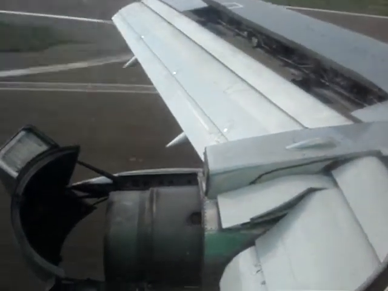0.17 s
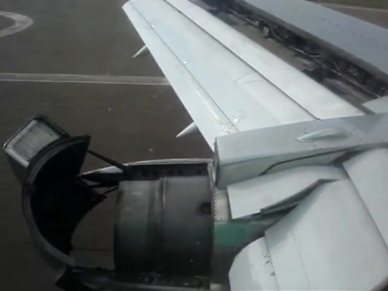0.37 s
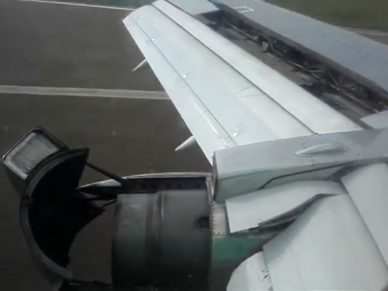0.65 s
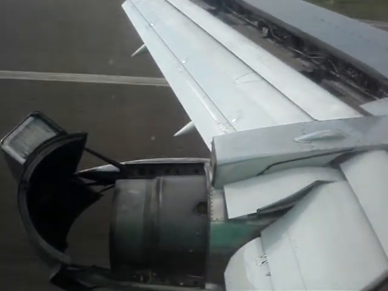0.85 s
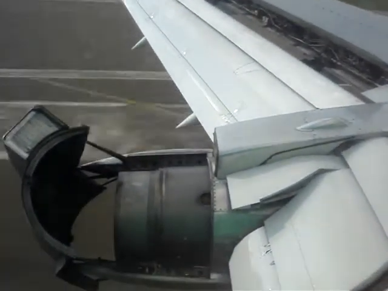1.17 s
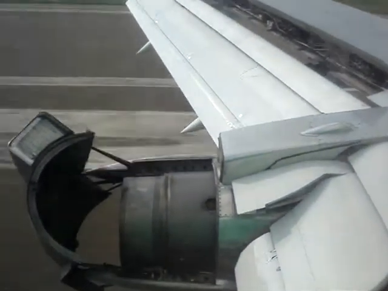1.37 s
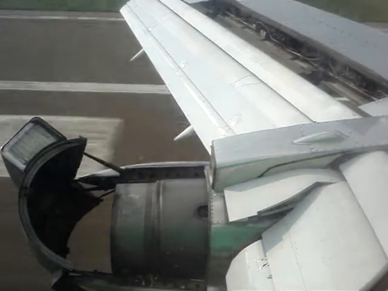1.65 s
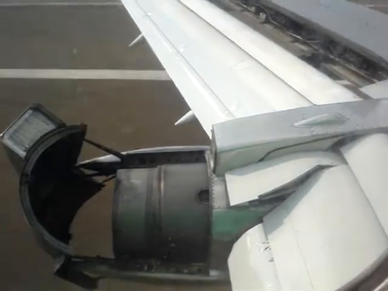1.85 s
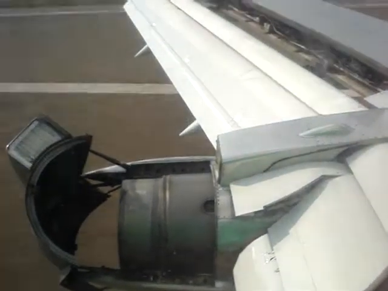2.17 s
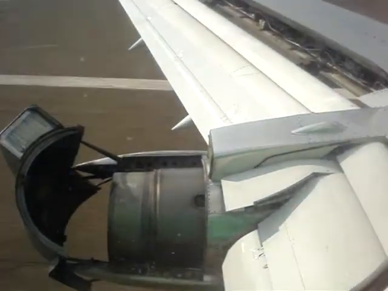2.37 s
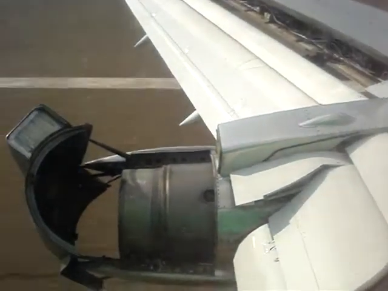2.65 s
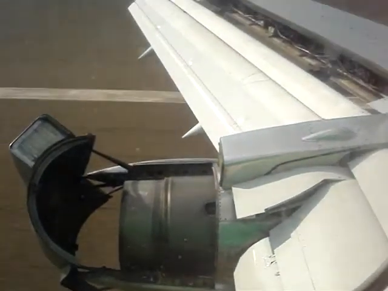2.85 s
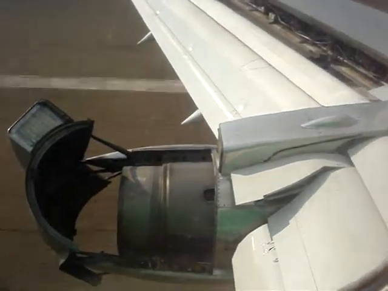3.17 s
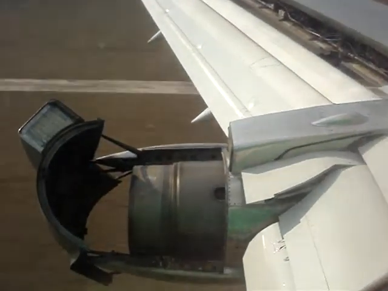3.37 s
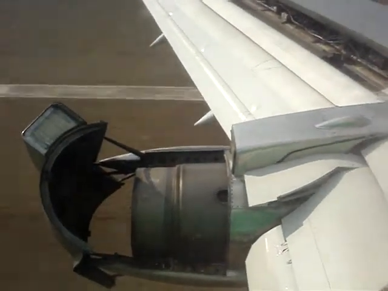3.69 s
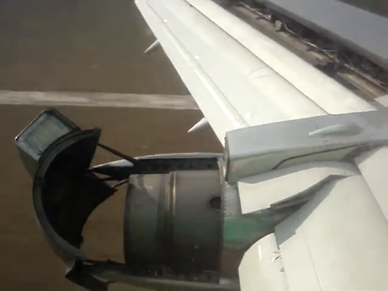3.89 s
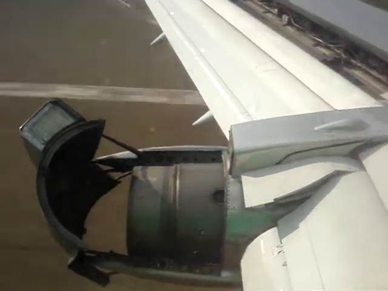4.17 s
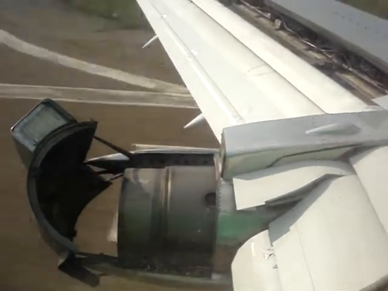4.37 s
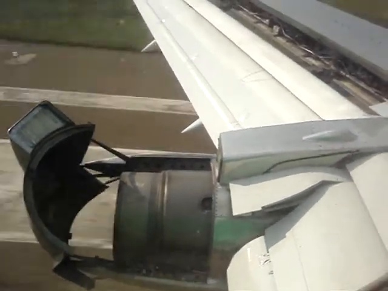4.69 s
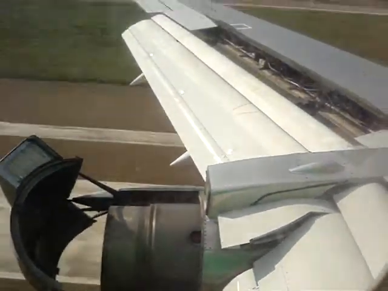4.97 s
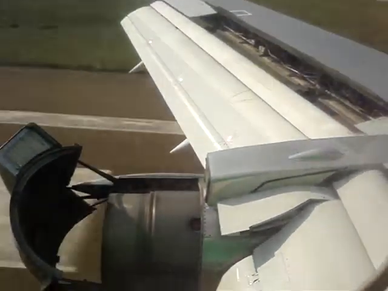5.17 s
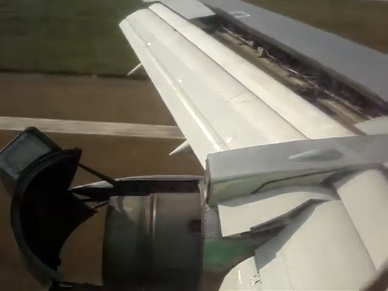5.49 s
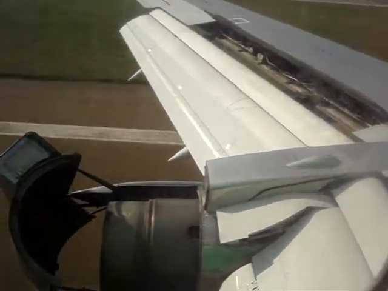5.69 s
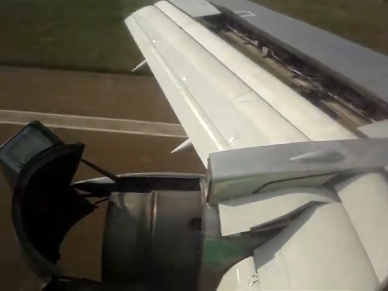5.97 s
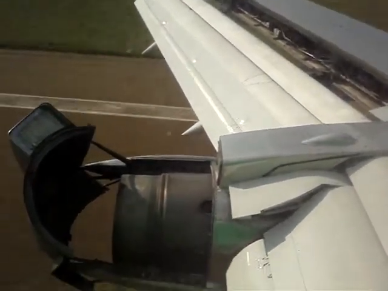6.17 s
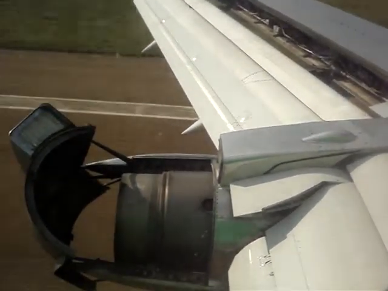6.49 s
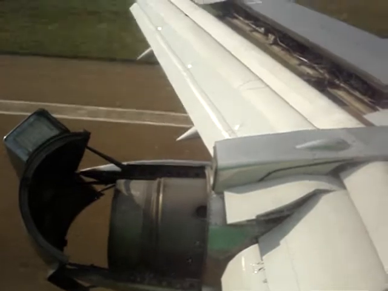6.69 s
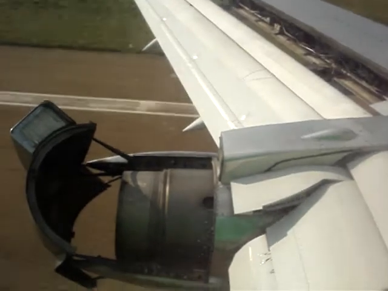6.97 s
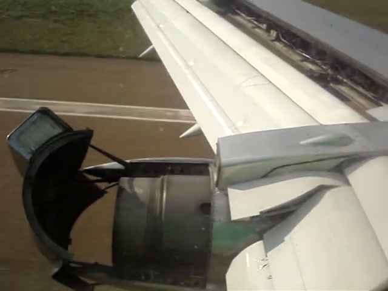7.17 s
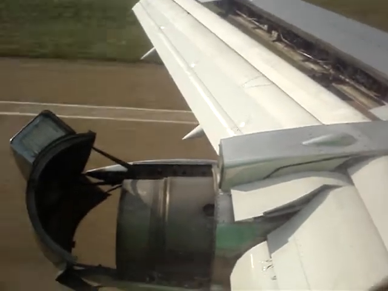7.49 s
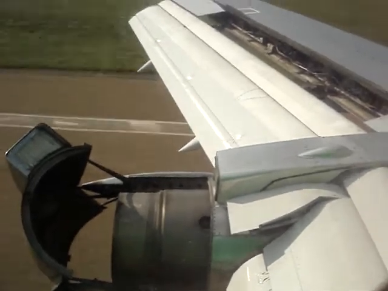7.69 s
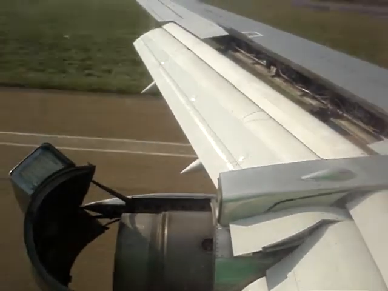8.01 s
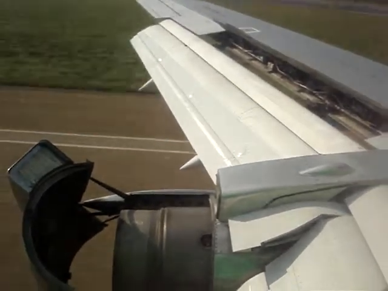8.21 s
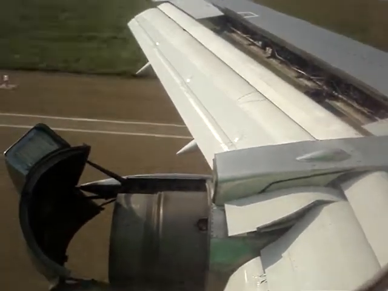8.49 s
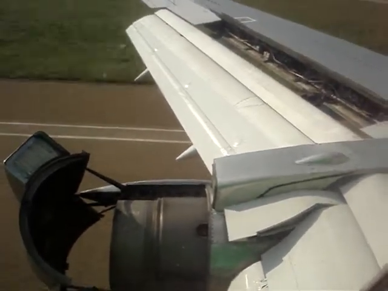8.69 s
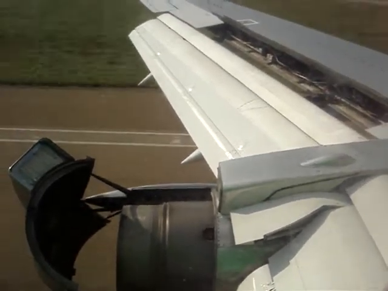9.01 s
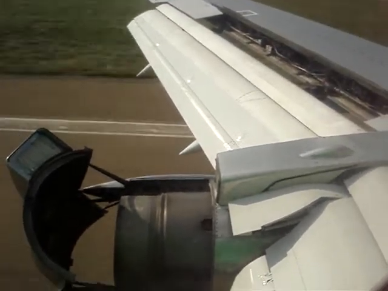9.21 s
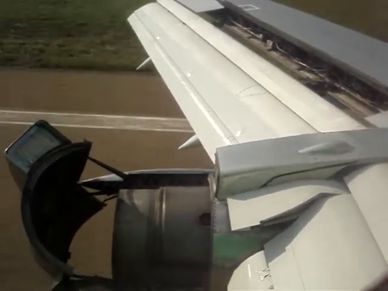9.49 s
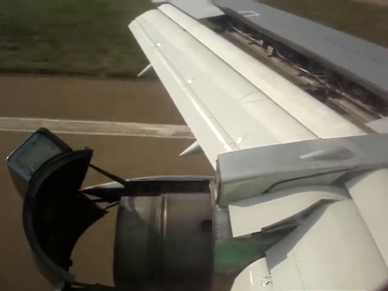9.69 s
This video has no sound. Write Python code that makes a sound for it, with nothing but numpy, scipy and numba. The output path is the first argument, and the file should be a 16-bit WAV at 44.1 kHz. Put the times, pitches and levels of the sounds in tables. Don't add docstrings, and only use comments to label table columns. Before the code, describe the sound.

A small camera at an airliner's cabin window, an arm's length from the plastic trim, during runway braking. From 0 s reversed thrust is already at full roar: a broad, deep boom around 200 to 350 Hz coming through the hull, with a weaker upper rush and faint hiss. Over it loose panels chatter in dense, dry, irregular bursts, bright around 1 to 5 kHz, swelling at each runway bump. From 0.6 s short hard knocks stand out, frequent from 1.6 to 6 s, with a strong one near 5.96 s. At about 6.4 s the braking eases and the rattle sinks fast; brief bump rattles come near 7, 7.4, 8 and 8.3 s, with scattered lighter ticks until the end. The roar wavers slightly from 6.5 to 8 s but stays loud to 9.8 s, ending abruptly. The sound is compressed, clipped at peaks, with flickering treble and nothing above 10 kHz.

```python
import sys
import numpy as np
from scipy import signal
from scipy.fft import rfft, irfft, next_fast_len
from scipy.io import wavfile
from scipy.ndimage import uniform_filter1d
from numba import njit

SR = 44100
rng = np.random.default_rng(int(sys.argv[2]) if len(sys.argv) > 2 else 0)


def nominal_scale(level):
    x = np.asarray(level, float) / 20
    return 10 ** x


def to_wav(sig):
    pcm = np.clip(np.atleast_2d(sig), -1, 1) * 32767
    pcm = np.round(pcm).astype(np.int16)
    wavfile.write(sys.argv[1], SR, pcm.T)


N = 434384
SPAN = next_fast_len(N)

# time_s, roar_db
THRUST = [(0.0, -15.5), (.5, -14.5), (1.7, -15), (2.9, -14.5), (3.3, -15), (4.3, -15), (5.8, -15),
          (6.55, -16.5), (6.8, -14), (7.05, -16), (7.35, -14), (7.9, -15.5), (8.6, -14), (9.5, -14.5),
          (9.85, -14.5)]
# time_s, effort (0-1)
BRAKING = [(0.0, 0.97), (1.0, 1.0), (1.25, 0.91), (1.6, 1.0), (2.9, 0.98), (3.3, .85), (3.7, 0.98),
           (4.4, 0.91), (5.3, .82), (5.7, 0.87), (6.35, 0.9), (6.55, 0.4), (7.5, 0.14), (8.9, 0.18),
           (9.6, .08), (9.85, -.2)]
# frequency_hz, level_db (per Hz)
HULL_ROAR = [(12, -49.5), (20, -49.5), (98, -13.5), (166, -3.5), (221, -1), (251, -1), (286, -1),
             (423, -9.5), (482, -13), (522, -13.5), (564, -16), (976, -24), (2560, -41), (7090, -61.5),
             (10200, -71.5), (13300, -90), (22000, -120)]
# frequency_hz, width_hz, gain_db
CABIN_MODES = [(86.6, 14, 0), (168, 13, 2.5), (217.2, 40, 3.5), (256.7, 12.2, -10), (295, 24, -0.5),
               (344, 41, 2.5), (484, 50, 3), (607, 77, 2.5), (1327, 110, 3.5), (1520, 22, 5.5),
               (1730, 420, -3.5), (2050, 230, 3.5), (3600, 3300, -5.5), (5530, 1200, 1), (8760, 6600, 3)]
# pitch_hz, t60_s, level_db
TRIM_RINGS = [(978, 0.04, 0), (1121, 0.046, 8), (1357, 0.012, 7.5), (2050, 0.0067, 1.5),
              (2580, 0.028, -1.5), (3100, 0.0085, 2.5)]
# frequency_hz, level_db (per Hz)
CLATTER = [(880, -31), (1500, -1.5), (1790, -4.5), (2000, -2), (2570, -0.5), (3770, -6.5), (5600, -7.5),
           (9090, -18), (10000, -18.5), (13000, -53), (22000, -120)]
# centre_s, added_rattle_db, length_s
JOLTS = [(0.102, 4.5, .12), (0.255, 1, 0.032), (0.342, 3, .07), (0.507, 2.5, 0.11), (0.656, 4, 0.24),
         (0.97, 3.5, .18), (1.648, 1, 0.13), (1.895, 5, .07), (2.227, 2.5, .09), (2.582, 1, 0.055),
         (2.884, 3.5, .07), (3.173, 6.5, 0.097), (3.581, 3.5, .09), (3.722, 2, .07), (3.914, 4, .07),
         (4.091, 5, .08), (4.525, 4.5, .13), (4.699, 5.5, 0.12), (4.94, 5, .13), (5.09, 3, .05),
         (5.382, 3.5, 0.081), (5.968, 4.5, 0.21), (6.247, -1, .06), (6.375, 0.5, 0.059), (6.96, 8, .09),
         (7.14, 6, 0.061), (7.398, 7.5, .07), (7.991, 5, .06), (8.268, 6.5, 0.048), (9.547, 4.5, 0.056)]
# start_s, peak_db, pitch_hz
HARD_TICKS = [(0.6, -16, 2620), (1.592, -15.5, 2280), (1.742, -13, 2480), (1.877, -14.5, 2670),
              (2.0447, -14.5, 2500), (2.2316, -12.5, 2510), (2.418, -16, 2510), (2.5718, -12, 2470),
              (2.7354, -12.5, 1930), (2.7627, -15.5, 3180), (2.8695, -17.5, 3100), (3.1736, -17, 3040),
              (3.4785, -14, 3180), (3.6923, -14, 2600), (3.805, -12.5, 2050), (3.9972, -15, 2620),
              (4.0657, -14, 2020), (4.255, -11.5, 2610), (4.487, -19.5, 2300), (4.573, -18, 3040),
              (4.696, -17, 2300), (4.871, -13, 2460), (4.9375, -15.5, 2710), (5.1814, -13.5, 2530),
              (5.487, -16.5, 2640), (5.5595, -16, 2490), (5.7678, -13.5, 2050), (5.821, -16, 2530),
              (5.94, -13.5, 2540), (5.9644, -10.5, 2710)]
# start_s, peak_db, pitch_hz
LATE_TICKS = [(6.5644, -23, 2970), (6.8419, -22, 2080), (6.9781, -19.5, 1810), (7.1248, -26.5, 2240),
              (7.411, -22.5, 2890), (7.482, -21, 2160), (7.717, -22.5, 2010), (8.11, -28, 2040),
              (8.56, -27.5, 2200), (8.77, -22.5, 2040), (8.845, -19.5, 2650), (8.9427, -22.5, 2060),
              (9.167, -28.5, 2080), (9.2924, -24, 2050), (9.5323, -22, 2260), (9.5972, -24.5, 2170)]
DROPOUT_EDGES = [4700, 5150, 5650, 6150, 6700, 7350, 8050, 8800, 9500, 11000]


def curve(table, column):
    rows = np.array(table)
    return np.interp(np.arange(N) / SR, rows[:, 0], rows[:, column])


def shape(table, hz):
    rows = np.array(table)
    return np.interp(np.log(hz), np.log(rows[:, 0]), rows[:, 1])


def unit(x):
    return x / np.sqrt(np.mean(x ** 2))


def walk(rate_hz):
    hold = int(SR / rate_hz)
    steps = np.repeat(rng.standard_normal(N // hold + 1), hold)
    slewed = uniform_filter1d(uniform_filter1d(steps, hold), hold)
    return unit(slewed[:N])


def ring(strike, hz, t60_s):
    decay = np.log(1000) / (max(t60_s, .001) * SR)
    pole = np.exp(2j * np.pi * hz / SR - decay)
    return signal.lfilter([1], [1, -pole], strike).imag


def roar(boom_hz=450, hiss_hz=1700, hiss_db=-39, flicker_db=0.43):
    hz = np.fft.rfftfreq(SPAN, 1 / SR) + 1e-3
    db = shape(HULL_ROAR, hz)
    for mode_hz, width_hz, gain_db in CABIN_MODES:
        db = db + gain_db / (1 + (2 * (hz - mode_hz) / width_hz) ** 2)
    jet = rfft(rng.standard_normal(SPAN)) * nominal_scale(db)

    low = 1 / (1 + (hz / boom_hz) ** 6)
    high = 1 / (1 + (hiss_hz / hz) ** 6)
    boom, upper, hiss = (unit(irfft(jet * share, SPAN)[:N]) for share in (low, 1 - low - high, high))
    thrust_db = curve(THRUST, 1)
    boom *= nominal_scale(thrust_db + 2.0)
    upper *= nominal_scale(thrust_db - 11 + 3.5 * curve(BRAKING, 1) + flicker_db * walk(10))
    return boom + upper + hiss * nominal_scale(hiss_db + 0.96 * walk(30))


def shake(calm_db=-52.5, braked_db=18, stir_s=0.033, stir_db_per_db=0.25, stir_from_db=-15.5):
    t = np.arange(0, N, 100) / SR
    effort = np.clip(curve(BRAKING, 1)[::100], -.5, 1.2)
    bed = calm_db + braked_db * effort

    def swell(centre_s, length_s):
        return np.exp(-(2 * (t - centre_s) / length_s) ** 2)

    db = bed + sum(gain_db * swell(centre_s, length_s) for centre_s, gain_db, length_s in JOLTS)
    threshold_db = stir_from_db + 0.4 * (bed - bed.max())
    for start_s, peak_db, _ in HARD_TICKS + LATE_TICKS:
        stir_db = stir_db_per_db * np.maximum(peak_db - threshold_db, 0)
        db += stir_db * swell(start_s, stir_s)
    return np.interp(np.arange(N) / SR, t, db)


def knocks(per_s, spread_db):
    moment, force, side = rng.random((3, 30000))[:, :int(per_s * N / SR)]
    out = np.zeros(N)
    out[(moment * N).astype(int)] = np.sign(side - .5) * nominal_scale(-spread_db * np.log(force + 0.00082))
    return out


def rattle(burst_db=-0.5, patchy_db=0.0, clatter_db=2.0):
    panels = 0
    for pitch_hz, t60_s, db in TRIM_RINGS:
        level = nominal_scale(db + patchy_db * walk(25))
        panels = panels + level * unit(ring(knocks(500, 2.9), pitch_hz, t60_s))

    hz = np.fft.rfftfreq(SPAN, 1 / SR) + 1e-3
    common = .8 * knocks(2400, 1.3)
    clatter = 0
    for centre_hz in 1600 * 1.3 ** np.arange(8):
        band = nominal_scale(shape(CLATTER, hz)) * np.exp(-(np.log(hz / centre_hz) / 0.23) ** 2)
        level = nominal_scale(1.1 * walk(50))
        contacts = common + knocks(2500, 2.2)
        clatter = clatter + level * irfft(rfft(contacts, SPAN) * band, SPAN)[:N]

    burst = nominal_scale(burst_db * walk(60) + 1.73 * walk(130))
    chatter = (unit(panels) + nominal_scale(clatter_db) * unit(clatter)) * burst
    return unit(chatter) * nominal_scale(shake() + 5.0)


def ticks(t60_s=0.013, crack_db=-9, crack_hz=4000):
    out = np.zeros(N + SR)
    t = np.arange(SR // 20) / SR
    for start_s, peak_db, pitch_hz in HARD_TICKS + LATE_TICKS:
        tone = np.sin(2 * np.pi * pitch_hz * t) * np.exp(-np.log(1000) * t / t60_s)
        crack = unit(ring(rng.standard_normal(len(t)), crack_hz, .0008)) * np.exp(-t / .004)
        start = int(start_s * SR)
        out[start:start + len(t)] += nominal_scale(peak_db - 2.0) * (tone + nominal_scale(crack_db) * crack)
    return out[:N]


def scene():
    return (roar() + rattle() + ticks())[None]


@njit
def ride(x, top, attack, release, slope):
    y, envelope = np.empty(len(x)), top
    for i in range(len(x)):
        level = abs(x[i])
        envelope += (level - envelope) * (attack if level > envelope else release)
        y[i] = x[i] * (top / max(envelope, 1e-6)) ** slope
    return y


def thin_treble(x, under_db, luck_db, size, top_hz=9990):
    hz, _, spec = signal.stft(np.pad(x, (0, size), "reflect"), SR, "cosine", size, boundary="even")
    count = spec.shape[1]
    strain = luck_db * rng.standard_normal(count)
    frames = np.minimum(np.arange(count) * size // 2, N - 1)
    strain -= .06 * (shake()[frames] + 38)
    for lo_hz, hi_hz in zip(DROPOUT_EDGES, DROPOUT_EDGES[1:]):
        band = (hz >= lo_hz) & (hz < hi_hz)
        db = 10 * np.log10(np.mean(np.abs(spec[band]) ** 2, axis=0) + 1e-18)
        dip = db - uniform_filter1d(db, size=15)
        luck = uniform_filter1d(rng.standard_normal(count), size=2)
        margin_db = .5 * dip + strain + 3.2 * luck - under_db - .12 * (lo_hz / 1000 - 7)
        spec[band] *= np.clip(margin_db / 0.36, .03, 1)
    spec /= np.sqrt(1 + np.minimum(hz[:, None] / top_hz, 1.5) ** 200)
    return signal.istft(spec, SR, "cosine", size)[1][:N]


def low_pass(x):
    return signal.sosfilt(signal.butter(12, 10360, fs=SR, output="sos"), x)


def record(dry):
    ridden = ride(dry[0], .2, 0.004, 0.00064, 0.36)
    lopsided = np.minimum(ridden - .13 * ridden ** 2, .452)
    filmed = thin_treble(lopsided - lopsided.mean(), -4.9, 1.2, size=1024)
    filmed = thin_treble(filmed, -3.4, 1.8, size=384)
    filmed *= np.minimum(np.arange(N)[::-1] / 120, 1)
    mix = np.maximum(filmed, -.708)[None]
    return low_pass(mix)


dry = scene()
out = record(dry)
to_wav(out)
```